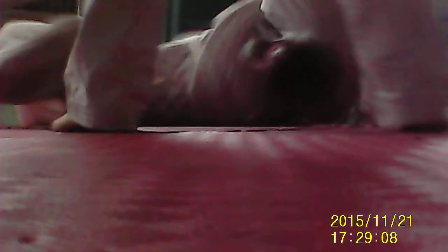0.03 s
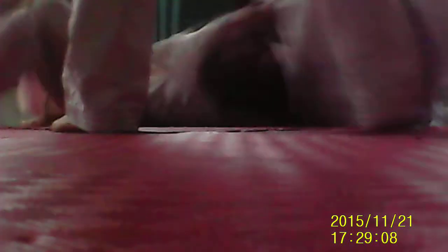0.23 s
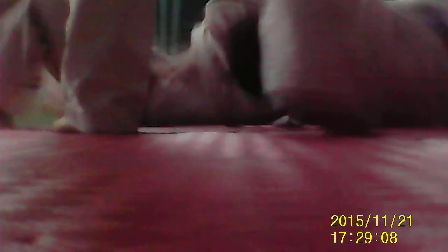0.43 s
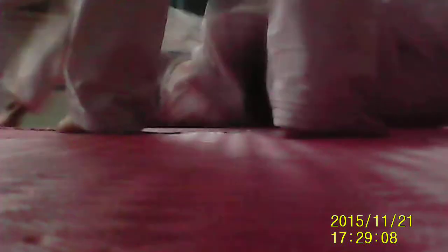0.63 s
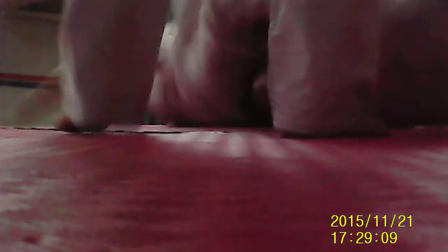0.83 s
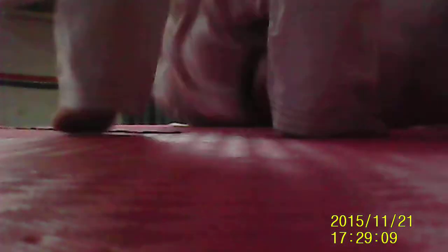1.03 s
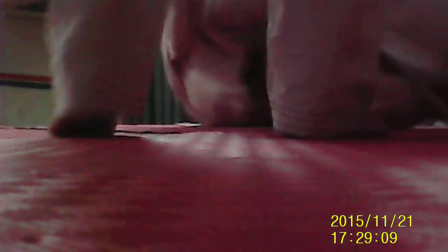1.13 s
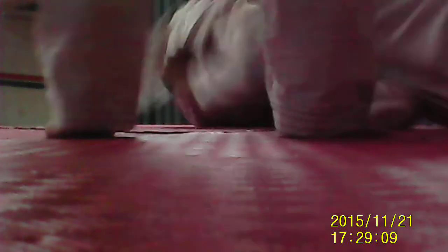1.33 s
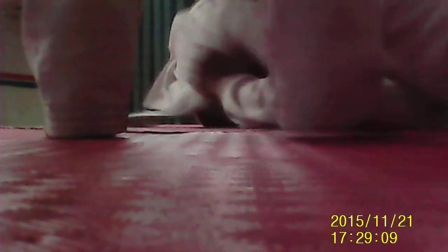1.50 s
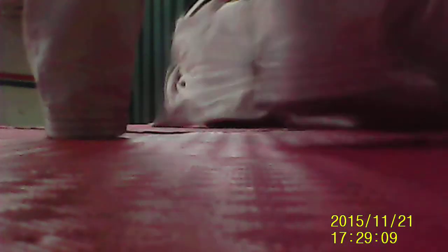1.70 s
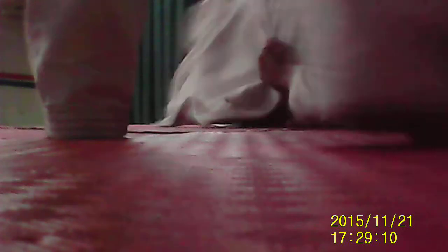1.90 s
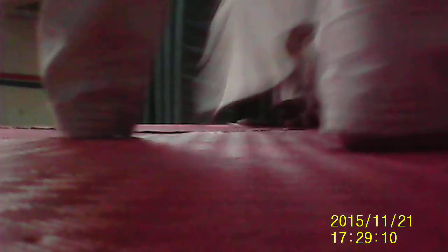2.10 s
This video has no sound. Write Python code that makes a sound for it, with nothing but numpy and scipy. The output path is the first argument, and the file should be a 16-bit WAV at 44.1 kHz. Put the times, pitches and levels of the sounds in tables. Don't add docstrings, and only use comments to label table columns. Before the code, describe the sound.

A body falls hard on a foam mat, booming and overloading the nearby small microphone; weaker thuds, quick scrapes and faint shuffles follow, with gym reverberation and a low, distant background bustle.

```python
import sys
import numpy as np
from scipy import signal
from scipy.fft import rfft, irfft
from scipy.io import wavfile
from scipy.ndimage import uniform_filter1d

SR = 44100
rng = np.random.default_rng(int(sys.argv[2]) if len(sys.argv) > 2 else 0)


def file_out(sig):
    cols = np.atleast_2d(sig).T
    lim = np.clip(cols, -1, 1)
    pcm = np.round(lim * 32767).astype(np.int16)
    wavfile.write(sys.argv[1], SR, pcm)


def gain_from_db(level_db):
    decades = np.asarray(level_db, float) / 20
    return 10 ** decades


N = 94815

# frequency in Hz, level in dB per Hz.
FOAM_SPECTRUM = [(180, -5.5), (280, -0.5), (600, -0.5), (1050, -3.5), (2000, -16), (3100, -26.5),
                 (4100, -25), (6200, -42)]


def evened(x):
    return x / np.sqrt(np.mean(x ** 2) + 1e-20)


def read(points, hz):
    f, value = np.transpose(points)
    return np.interp(np.log(hz + 1), np.log(f + 1), value)


def add(mix, s, sound):
    part = mix[round(s * SR):][:len(sound)]
    part += sound[:len(part)]


def colour(x, points, tilt_db=0):
    hz = np.fft.rfftfreq(len(x), 1 / SR)
    inside = (hz > points[0][0]) & (hz < points[-1][0])
    level_db = read(points, hz) + tilt_db * np.log2(hz / 1000 + 1e-3)
    gain = evened(inside * gain_from_db(level_db))
    return irfft(rfft(x) * gain, len(x))


def air():
    # frequency in Hz, level in dB per Hz.
    bustle = [(20, -16.5), (60, -12), (350, -14.5), (1300, -20), (2200, -29.5), (3200, -36), (4100, -31.5),
              (6200, -47.5)]
    level_db, patch_db = -44, 1.5
    frames, hz = N // 256 + 5, np.fft.rfftfreq(1024, 1 / SR)
    real, imaginary, patches = rng.standard_normal((frames, 513, 3)).T
    patches = uniform_filter1d(patches, 8, 0)
    patches = evened(uniform_filter1d(patches, 12, 1))
    gain = gain_from_db(read(bustle, hz)[:, None] + patch_db * patches)
    z = (real + 1j * imaginary) * gain * (hz < bustle[-1][0])[:, None]
    noise = signal.istft(z, nperseg=1024, noverlap=768)[1][:N]
    return gain_from_db(level_db) * evened(noise)


def scuffs():
    # start in seconds, length in seconds, level in dB, brightness in dB per octave.
    strokes = [
        (.212, 0.045, -29, 4),
        (0.758, 0.034, -31.5, 0),
        (0.824, .1, -40.5, 5),
        (0.955, 0.02, -39.5, 4.5),
        (1.305, 0.013, -27.5, -0.5),
        (1.461, 0.14, -48.5, 6.5),
        (1.585, 0.15, -53.5, 11),
        (1.826, 0.1, -53.5, 4.5),
        (2.05, .09, -77, 1),
    ]
    grains_per_s, grain_db = 9000, 1.5
    out = np.zeros(N)
    grains = rng.standard_normal(N) * gain_from_db(grain_db * rng.exponential(1, N))
    grains *= rng.random(N) < grains_per_s / SR
    for s, length, level_db, tilt_db in strokes:
        cloth = evened(colour(grains, FOAM_SPECTRUM, tilt_db))
        rub = cloth[round(s * SR):][:round(length * SR)]
        swell = np.sin(np.pi * np.linspace(0, 1, len(rub)) ** 1.18) ** 0.4
        add(out, s, gain_from_db(level_db) * rub * swell)
    return out


def landings():
    # start in seconds, push in dB, floor ring in Hz, ring t60 in seconds, slap in dB.
    falls = [(0.227, -12, 240, .03, -23), (.233, 5, 239, 0.054, -6.5), (0.2428, 9.5, 203, 0.06, -9.5),
             (.261, 0.5, 224.3, 0.19, -17), (0.2831, 0.5, 190, 0.077, -18.5),
             (.3035, -10.5, 236.7, 0.16, -22.5), (.791, -14, 110, .05, -35.5),
             (0.8043, -6, 173, 0.063, -21), (0.8149, -5.5, 198, 0.045, -20),
             (0.831, -12, 101.7, 0.38, -63.5), (0.965, -18, 127, 0.18, -35),
             (0.978, -23.5, 149.5, 0.26, -25), (0.999, -14, 205, 0.033, -24), (1.021, -15, 164, 0.1, -28),
             (1.314, -15, 174, 0.029, -29), (1.321, -14, 90.4, .12, -42), (1.388, -33.5, 108.3, 0.55, -62),
             (1.705, -23.5, 109, 0.11, -35), (1.716, -21.5, 170.6, .12, -45), (1.7462, -21, 101, 0.13, -38),
             (1.831, -21.5, 186.5, 0.12, -39), (1.859, -27.5, 208.7, 0.17, -38),
             (1.875, -18, 175, 0.061, -43), (1.952, -38.5, 154, 0.078, -65)]
    # frequency in Hz, level in dB per Hz.
    boards = [(22, -5.5), (50, -12.5), (110, -2), (200, -1.5), (350, -5.5), (700, -17.5)]
    push_rise_s, slap_rise_s, sag = 0.00067, 0.00067, 0.15
    shudder_db, shudder_t60, slap_t60 = -14.5, 0.14, 0.1
    t = np.arange(SR // 2) / SR
    push, shudder_power, slap_power = np.zeros(N), np.zeros(N), np.zeros(N)
    for s, push_db, hz, t60, slap_db in falls:
        turns = np.cumsum(hz * (1 + sag * np.exp(-t * hz))) / SR
        rise = 1 - np.exp(-t / push_rise_s)
        slap_rise = 1 - np.exp(-t / slap_rise_s)
        add(push, s, rise * gain_from_db(push_db - 60 * t / t60) * np.sin(2 * np.pi * turns))
        add(shudder_power, s, rise ** 2 * gain_from_db(2 * (push_db + shudder_db - 60 * t / shudder_t60)))
        add(slap_power, s, slap_rise ** 2 * gain_from_db(2 * (slap_db - 60 * t / slap_t60)))
    noise = rng.standard_normal((2, N))
    shudder = np.sqrt(shudder_power) * colour(noise[0], boards)
    slap = np.sqrt(slap_power) * colour(noise[1], FOAM_SPECTRUM)
    return push, shudder, slap


def snaps():
    # start in seconds, peak in dB, pitch in Hz, length in seconds.
    cracks = [(.2368, -12, 1900, .003), (.2645, -7, 4050, .004), (.279, -18, 4200, .004),
              (.7765, -40, 3900, .005), (.8022, -22, 1950, .005), (.8105, -32, 4900, .004),
              (.9755, -38, 4000, .005), (.984, -26, 1400, .004), (1.005, -39, 3900, .006),
              (1.3006, -25, 1400, .002), (1.3095, -26, 900, .004), (1.7035, -35, 1500, .004),
              (1.711, -36, 1600, .003), (1.711, -43, 4500, .003), (1.828, -37, 1200, .003),
              (1.8365, -39, 3500, .003), (1.9525, -43, 3700, .003), (1.9525, -40, 1500, .003),
              (1.960, -30, 1900, .002), (1.960, -35, 3800, .002)]
    out = np.zeros(N)
    for s, peak_db, hz, length in cracks:
        t = np.arange(0, length, 1 / SR)
        bump = np.sin(np.pi * t / length) ** 2
        add(out, s, gain_from_db(peak_db) * bump * np.sin(2 * np.pi * hz * t))
    return out


def hall(x):
    # frequency in Hz, t60 in seconds.
    decay = [(40, 1.0), (120, 1), (300, 0.72), (1000, 1.0), (3000, 0.66), (6000, 0.84)]
    start_s, spacing = 0.01, 20
    taps = np.zeros(SR)
    at = np.arange(0, SR - spacing, spacing)
    taps[at + rng.integers(0, spacing, len(at))] = rng.choice([-1., 1.], len(at))
    taps *= np.clip(np.arange(SR) / SR / start_s - .5, 0, 1)
    hz, t, z = signal.stft(taps, SR, nperseg=512)
    fade = gain_from_db(-60 * t / read(decay, hz)[:, None])
    tail = signal.istft(z * fade, SR, nperseg=512)[1]
    return signal.fftconvolve(x, tail / np.linalg.norm(tail))[:N]


def scene():
    push, shudder, slap = landings()
    snap, rub = snaps(), scuffs()
    wet = gain_from_db(-16) * push + gain_from_db(4.5) * shudder
    wet += gain_from_db(-4.5) * (slap + rub) + gain_from_db(-23.5) * snap
    angle = 2 * np.pi * 9 * np.arange(N) / SR + np.pi / 3 * np.arange(3)[:, None]
    turns = np.cos(angle) * np.sqrt(2 / 3)
    echoes = sum(hall(wet * turn) for turn in turns)
    return (push + shudder + slap + snap + rub + echoes + air())[None]


def top_cut(x):
    return signal.sosfilt(signal.butter(12, 15900, fs=SR, output="sos"), x)


def record(dry):
    bass_hz, edge_hz, ceiling, offset = 15, 5450, .712, .0085
    edge = signal.firwin(141, edge_hz, window=("kaiser", 8), fs=SR)[None]
    bass_cut = signal.lfilter(*signal.butter(1, bass_hz, "high", fs=SR), dry)
    narrow = signal.oaconvolve(bass_cut, edge, "same")
    clipped = np.clip(narrow + offset, -ceiling, ceiling)
    return top_cut(uniform_filter1d(clipped, size=2))


dry = scene()
out = record(dry)
file_out(out)
```